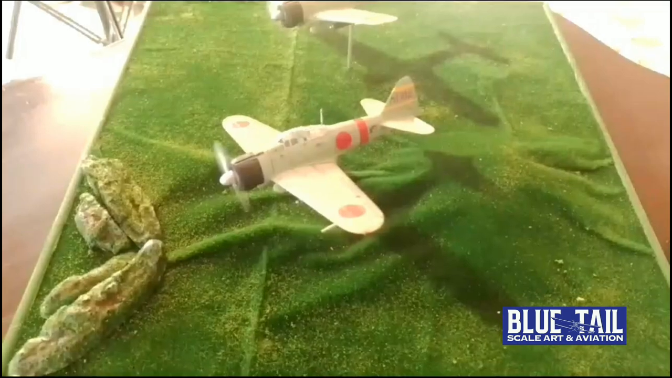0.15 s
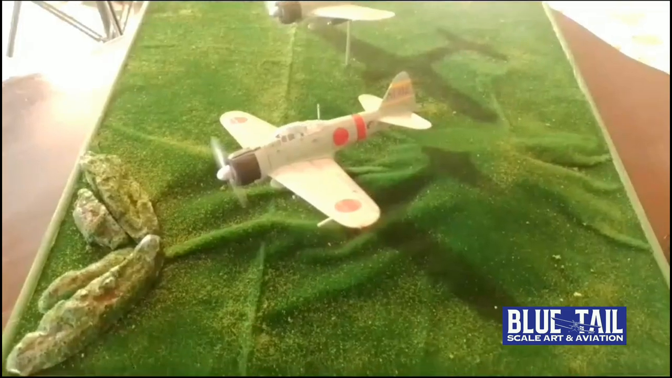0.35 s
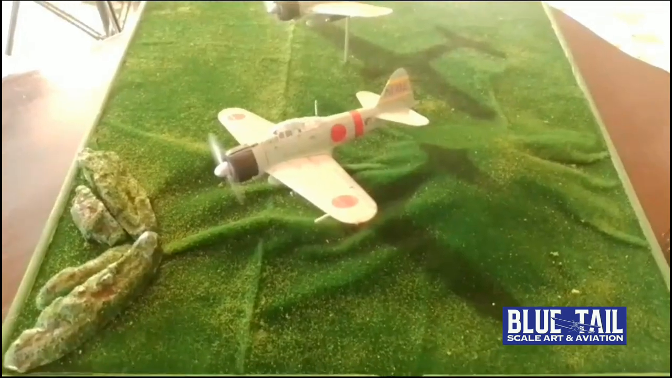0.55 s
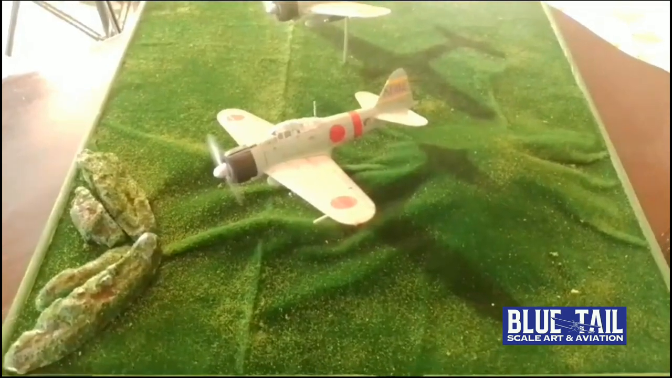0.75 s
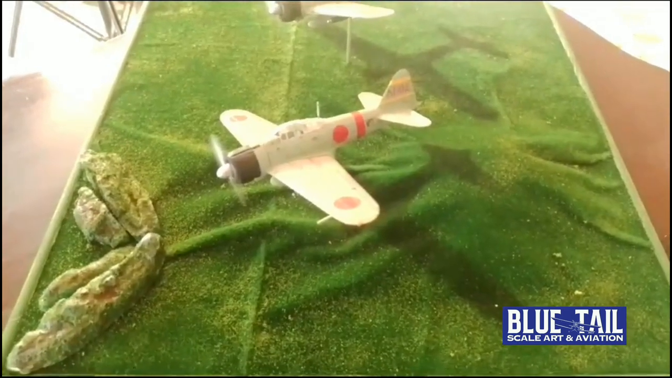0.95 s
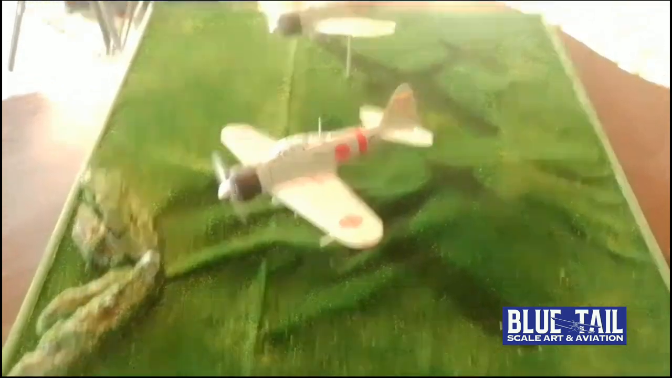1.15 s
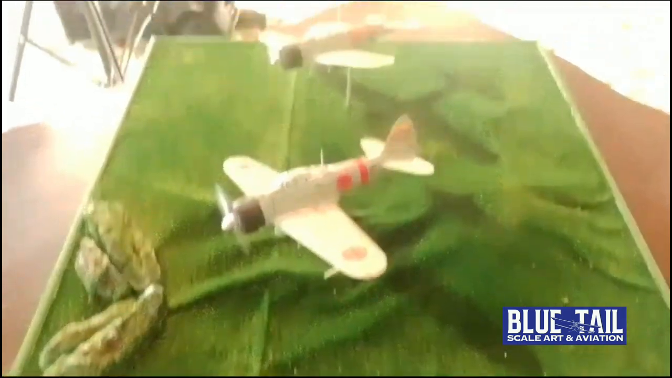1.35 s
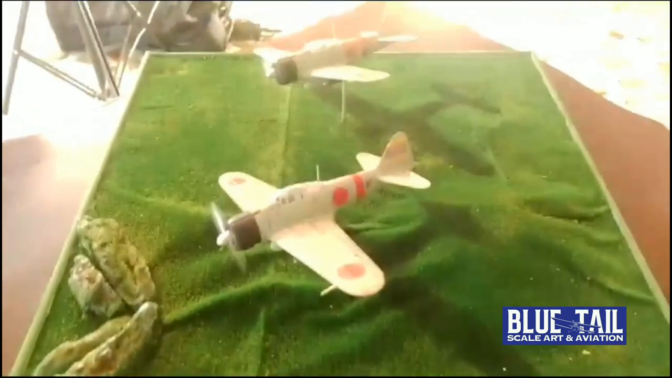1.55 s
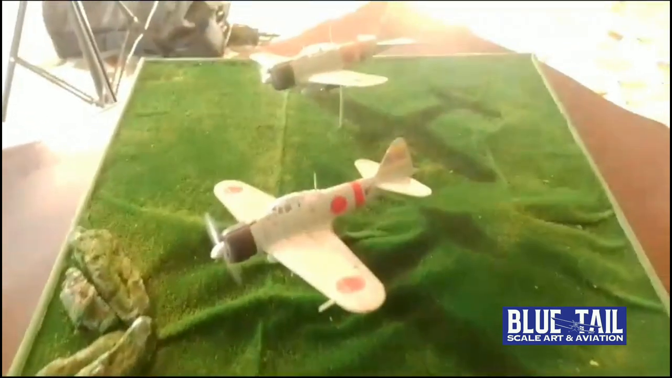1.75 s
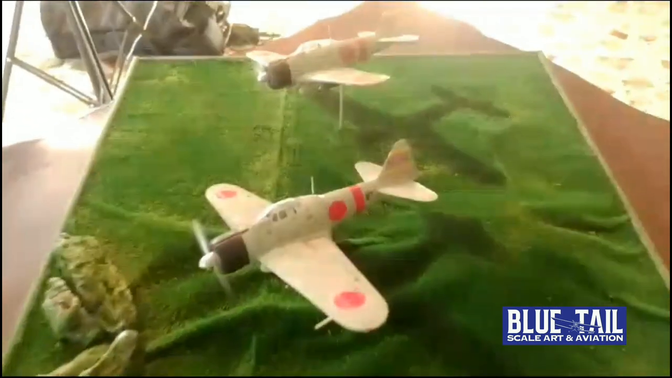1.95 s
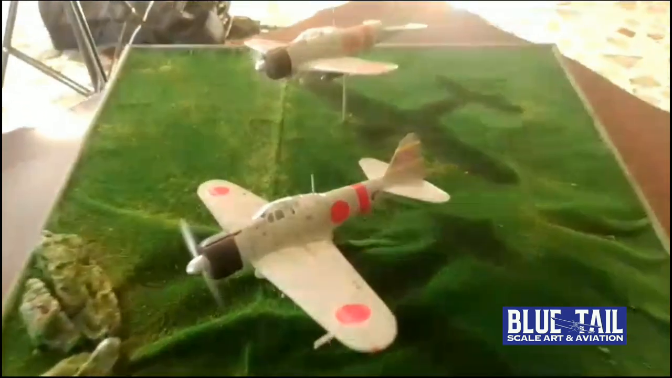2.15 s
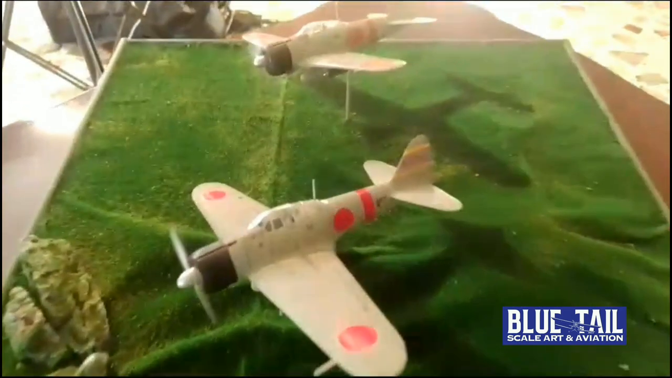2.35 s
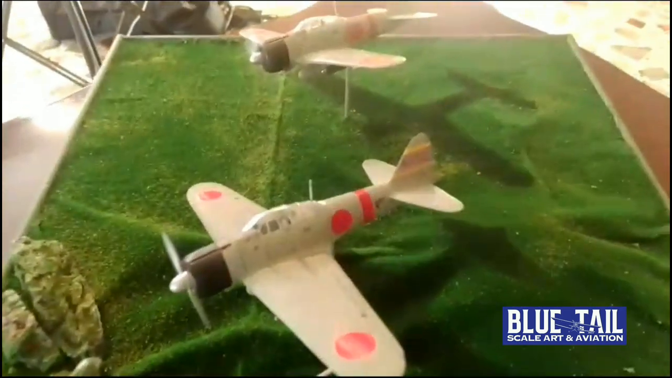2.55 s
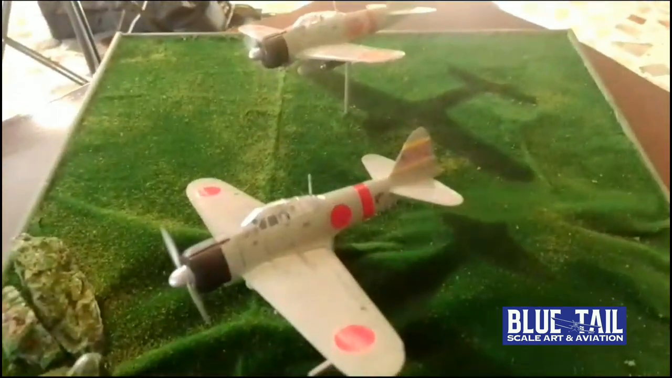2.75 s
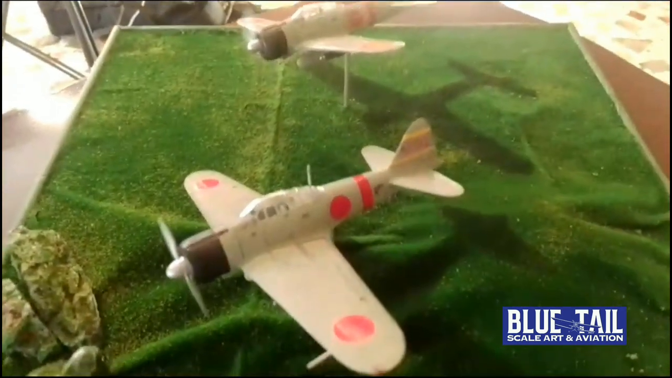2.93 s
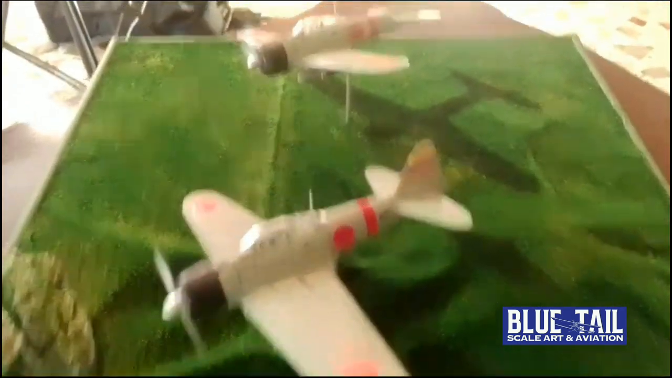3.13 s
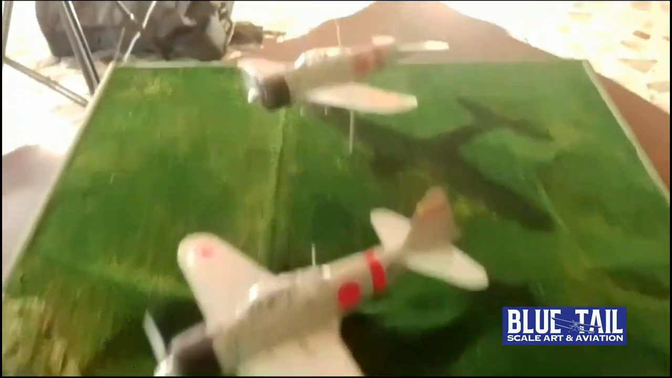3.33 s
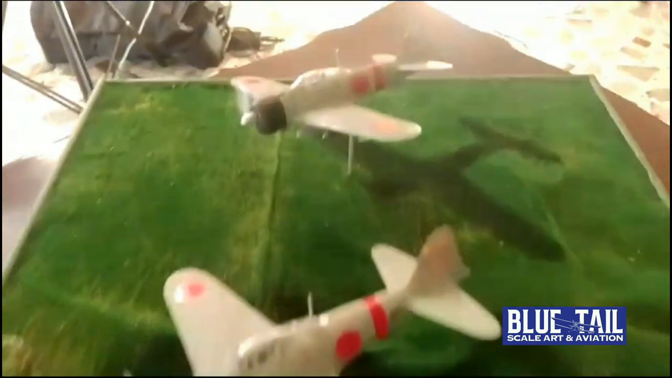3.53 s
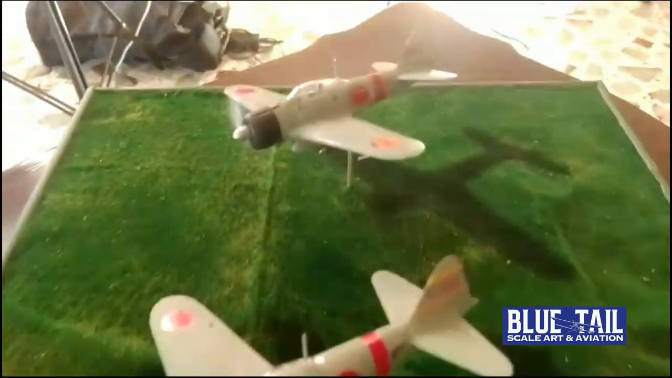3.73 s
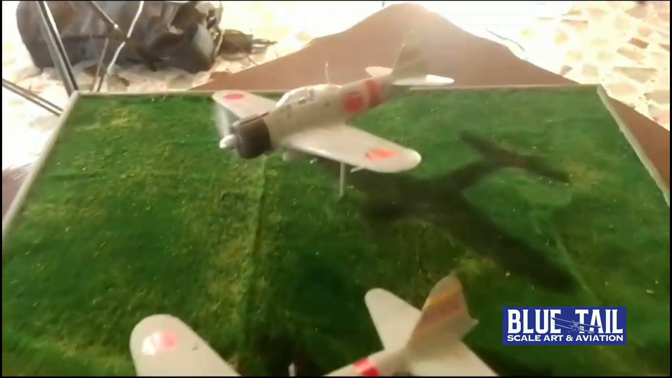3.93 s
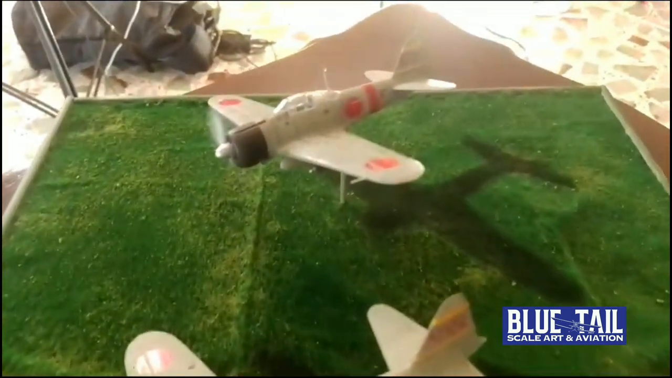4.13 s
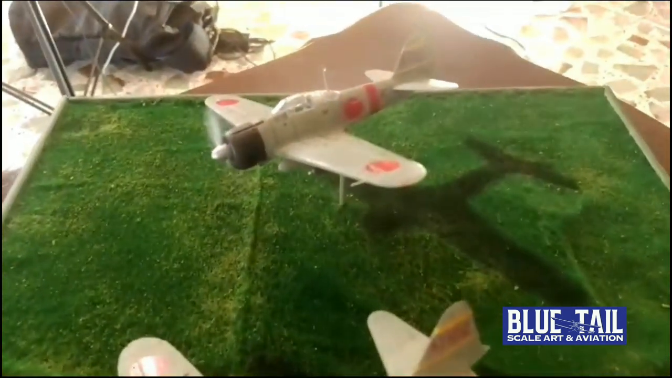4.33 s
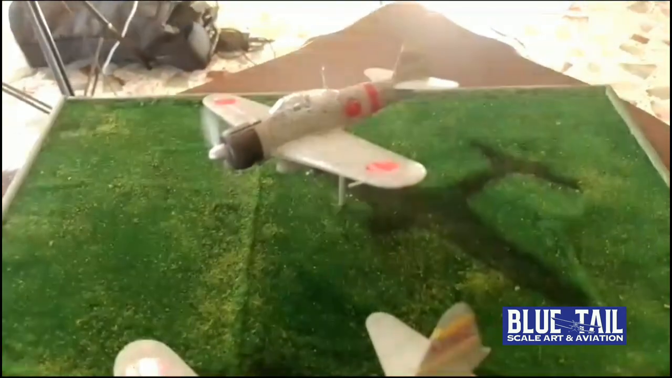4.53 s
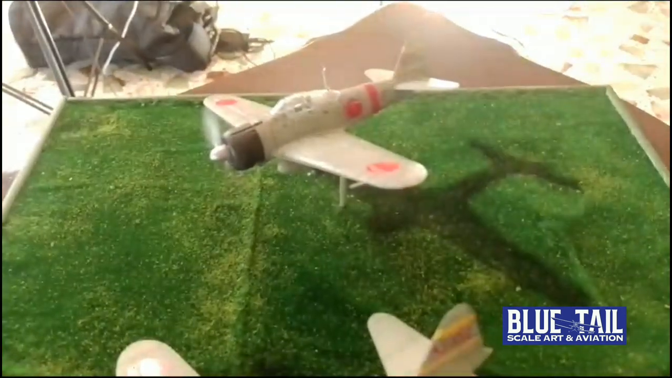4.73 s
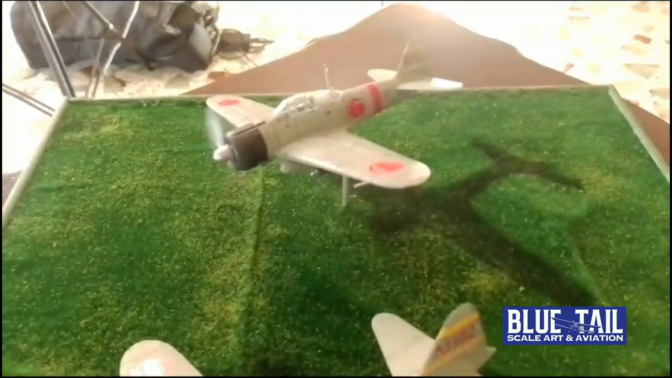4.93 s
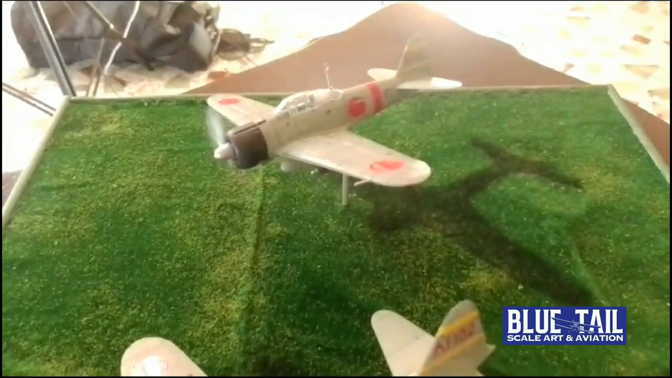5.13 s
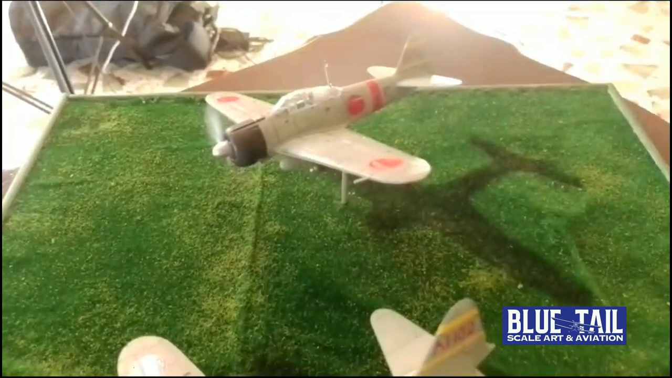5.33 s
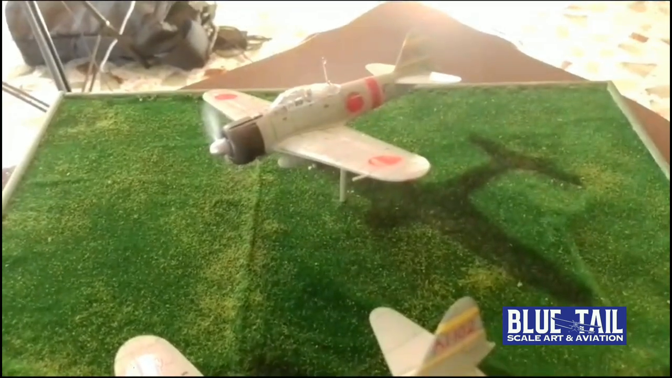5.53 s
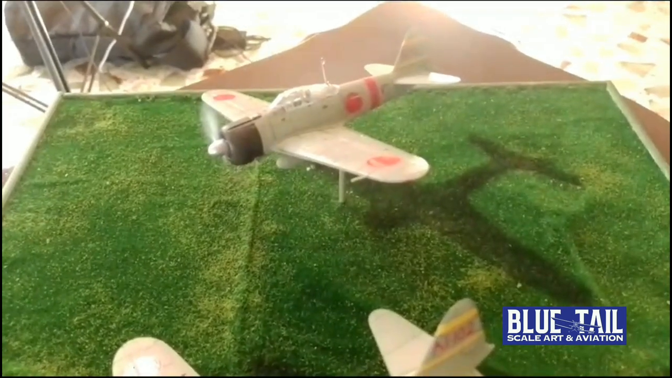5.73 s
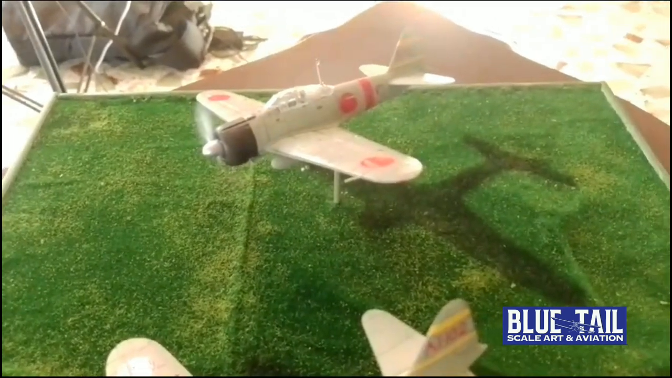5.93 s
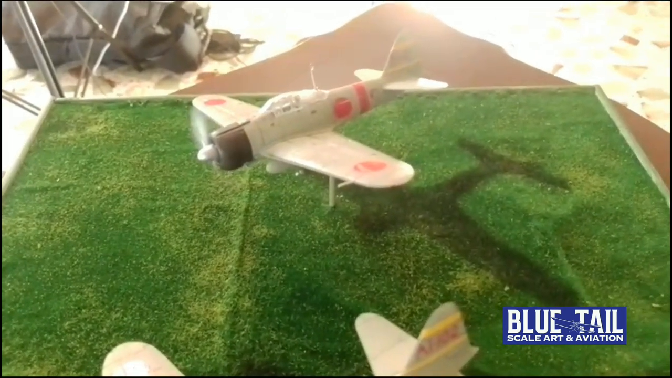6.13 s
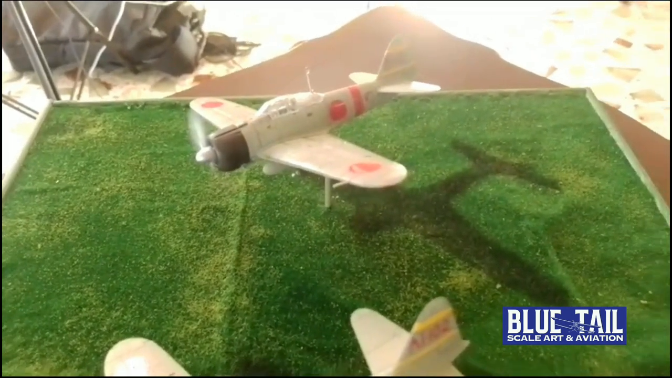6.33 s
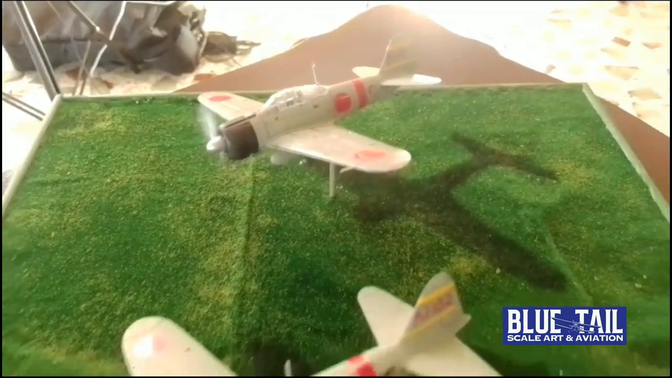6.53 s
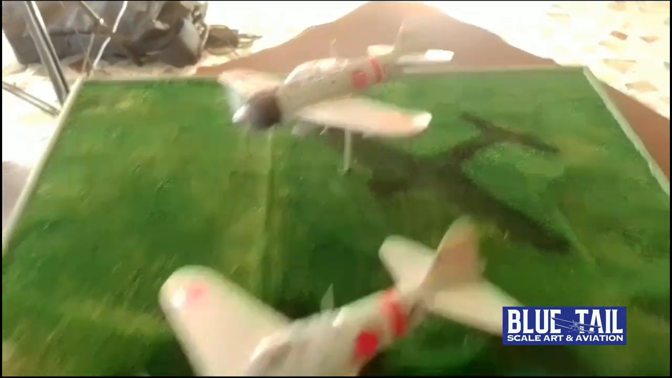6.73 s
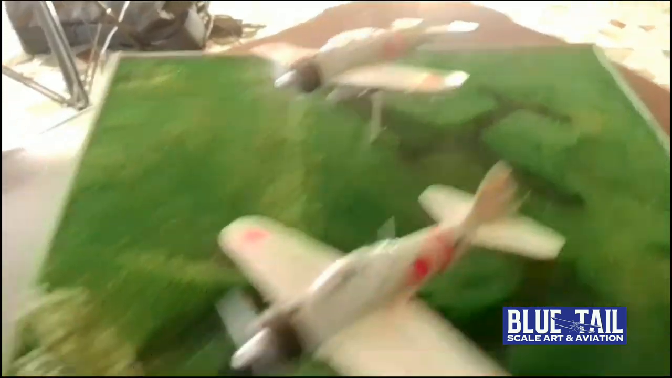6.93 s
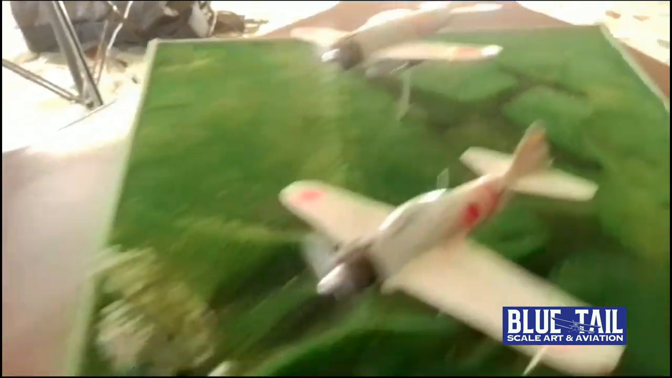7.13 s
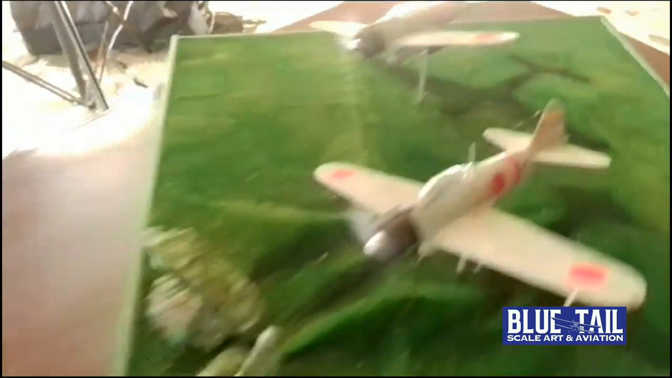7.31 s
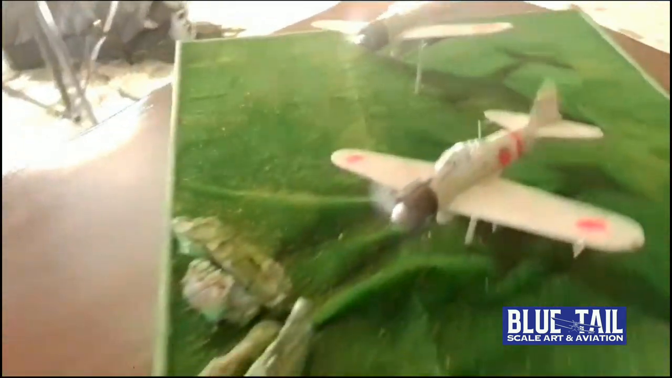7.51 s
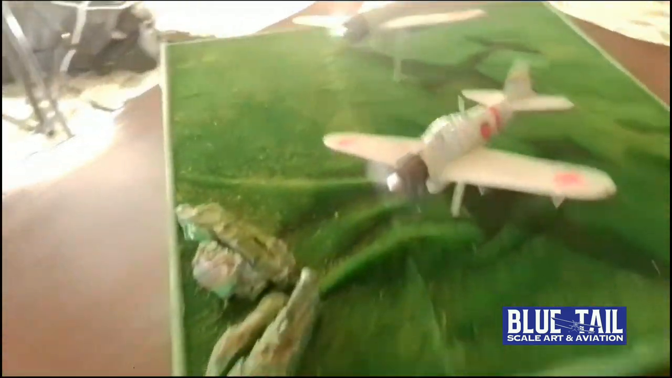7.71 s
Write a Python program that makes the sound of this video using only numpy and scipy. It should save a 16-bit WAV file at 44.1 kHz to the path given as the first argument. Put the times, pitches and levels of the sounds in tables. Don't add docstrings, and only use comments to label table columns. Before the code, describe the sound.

About 0.7 seconds of complete silence, then two small brushed motors on model planes cut in abruptly at steady speed. Dry, rapid bearing scraping makes a bright, sizzling whirr, with a faint buzz and whine from the nearer motor. A thin handheld phone microphone moves between them in a quiet room, so high metallic rings come and go. A hoarse, unsteady drone swells faintly around the middle. The whirr continues to the end.

```python
import sys
import numpy as np
from scipy import signal
from scipy.fft import rfft, irfft, next_fast_len
from scipy.io import wavfile
from scipy.ndimage import uniform_filter1d

SR = 44100
rng = np.random.default_rng(int(sys.argv[2]) if len(sys.argv) > 2 else 0)


def volts(x):
    e = np.asarray(x, float) / 20
    return 10 ** e


def unload_wav(signal):
    wavfile.write(
        sys.argv[1],
        SR,
        np.round(np.clip(np.atleast_2d(signal).T, -1, 1) * 32767).astype(np.int16),
    )


N = 347067
T = np.arange(N) / SR

# (from [s], to [s])
ALWAYS = (0, 9)
FRONT = (0, 1.85)
FRONT_CLOSE = (1.25, 1.9)
BETWEEN = (2, 4.05)
RISING = (3.4, 9)
REAR = (4.1, 7)
SWEEP = (6.7, 7.3)
AWAY = (7.3, 9)
# (frequency [Hz], density [dB per Hz])
HISS = [(1180, -61), (2000, -47), (3350, -35.5), (4300, -7.5), (4800, -10.5), (5950, -12), (7130, 6.5),
        (8320, -3), (10200, -18.5), (11500, 8.5), (12300, -3), (15600, -14)]


def curve(rows):
    s, *columns = np.transpose(rows)
    return [np.interp(T, s, column) for column in columns]


def unit(x):
    return x / np.sqrt(np.mean(x ** 2))


def walk(rate):
    hold = int(SR / rate)
    steps = np.repeat(rng.standard_normal(N // hold + 1), hold)
    return 1.43 * uniform_filter1d(uniform_filter1d(steps, hold), hold)[:N]


def ring(x, hz, width, order=2):
    band = [hz - width / 2, hz + width / 2]
    return unit(signal.sosfilt(signal.butter(order, band, "band", fs=SR, output="sos"), x))


def sliding(force, centre, width, order):
    carrier = np.exp(2j * np.pi * np.cumsum(curve(centre)[0]) / SR)
    lowpass = signal.butter(order, width / 2, fs=SR, output="sos")
    return unit((signal.sosfilt(lowpass, force / carrier) * carrier).real)


def colour(x, points):
    hz, db = np.transpose(points)
    size = next_fast_len(N)
    log_hz = np.log(np.arange(size // 2 + 1) * SR / size + 1)
    gain = volts(np.interp(log_hz, np.log(hz), db))
    return unit(irfft(rfft(x, size) * gain, size)[:N])


def toward_phone(start, end, fade_s):
    return np.clip(np.minimum(T - start, end - T) / fade_s + .5, 0, 1)


def facing(force, rings, fade_s, flicker_db, order=2):
    out = 0
    for hz, width, db, (start, end) in rings:
        gain = toward_phone(start, end, fade_s) ** 2 * volts(db + flicker_db * walk(9))
        out = out + gain * ring(force, hz, width, order)
    return out


def spells(rows, fade_s, flicker_db):
    power = sum(volts(2 * db) * toward_phone(start, end, fade_s) for start, end, db in rows)
    return np.sqrt(power) * volts(flicker_db * walk(10))


def turning(hz, wobble):
    return np.cumsum(hz * (1 + wobble * walk(9))) / SR


def orders(turns, lines):
    return sum(volts(db + 1.84 * walk(12)) * np.sqrt(2) * np.sin(2 * np.pi * k * turns) for k, db in lines)


def scrape(turns, scrapes, scatter_db, jitter, rise_ms, fall_ms, rub_db):
    rasp = np.zeros(N)
    for share, db in scrapes:
        count = np.arange(1, int(turns[-1]) + 1)
        late, louder = rng.standard_normal((len(count), 2)).T
        contact = np.searchsorted(turns[:-1], count + share + jitter * late)
        rasp[contact] += volts(db + scatter_db * louder)
    for ms in (rise_ms, fall_ms):
        rasp = signal.lfilter([1], [1, -np.exp(-1000 / ms / SR)], rasp)
    return unit((unit(rasp) + volts(rub_db)) * rng.standard_normal(N))


def scrape_hiss(force):
    grit = np.sign(rng.standard_normal(N))
    return colour(force * grit, HISS)


def hand_distance():
    # (time [s], rear motor level [dB], front motor level [dB])
    near = [(.7, -28, -26), (1.25, -27.5, -27.5), (1.7, -28.5, -25), (1.9, -32.5, -26), (2.3, -27.5, -27.5),
            (3, -27, -29.5), (3.5, -27, -25), (4, -28.5, -28), (4.4, -27.5, -25.5), (5, -27, -25.5),
            (5.7, -26, -28), (6.4, -28.5, -27), (6.8, -27.5, -25.5), (7.1, -27, -26), (7.87, -26.5, -24)]
    return [volts(db + 1.0 * walk(8)) for db in curve(near)]


def rear_shaft():
    # (time [s], shaft speed [turns per s])
    speed = [(.7, 56.7), (2.5, 57.6), (3.5, 57.6), (7, 59.4), (7.87, 59.6)]
    return turning(curve(speed)[0], wobble=.002)


def rear_bearing(turns):
    # (share of the turn [0-1], strength [dB])
    scrapes = [(0, -6.5), (.22, -17), (.49, -5.5), (.8, -21)]
    return scrape(turns, scrapes, scatter_db=0.5, jitter=0.0031, rise_ms=0.68, fall_ms=0.86, rub_db=-14.5)


def rear_motor(force):
    rings = [ (6863, 320, -7, ALWAYS), (7370, 370, -8.5, ALWAYS), (7953, 405, -4, ALWAYS),
             (8236, 296, -7.5, ALWAYS), (8750, 190, -23, BETWEEN), (9300, 170, -12, (1.45, 4.14)),
             (9150, 200, -14, SWEEP), (8584, 420, -18, AWAY), (5820, 110, -23, FRONT),
             (12300, 330, -10, (2.8, 4.6)), (8900, 140, -6, (9.8, 9)), (5530, 140, -20, REAR),
             (4980, 190, -12.5, AWAY), (3642, 114, -27, ALWAYS), (3608, 104, -20, (4.52, 7.7)),
             (3953, 166, -25.5, ALWAYS), (10550, 210, -7, (3.88, 7.2)), (11430, 300, -2.5, REAR),
             (12250, 310, -3, REAR), (808.6, 58, -30.5, ALWAYS)]
    # (time [s], centre [Hz])
    cowl_hz = [(2, 5730), (3.7, 5830), (4.5, 5966), (6.6, 5960), (7.2, 5740)]
    # (from [s], to [s], level against the motor [dB])
    cowl = [(2, 4.05, -13.5), (4.05, 5.7, -12.5), (5.7, 7, -13.5), (7, 7.45, -17)]
    out = facing(force, rings, fade_s=0.37, flicker_db=1.0)
    out = out + volts(-8.0) * scrape_hiss(force)
    return out + spells(cowl, .3, 0.84) * sliding(force, cowl_hz, width=150, order=2)


def front_shaft():
    # (from [s], shaft speed [turns per s], hunting [turns per s])
    ways = [(0, 126.5, .2), (1.93, 134.8, .5), (3.9, 136.8, .4), (4.1, 132.6, .7), (5.55, 139, .7),
            (6.16, 137.3, .8), (6.46, 133.9, .6), (7.14, 138.6, 1), (7.45, 139.6, .8)]
    s, hz, hunt_hz = np.transpose(ways)
    settle_s, hunt_per_s = .1, 9
    now = np.searchsorted(s, T, "right") - 1
    speed = uniform_filter1d(hz[now], int(settle_s * SR)) + hunt_hz[now] * walk(hunt_per_s)
    return turning(speed, wobble=.001)


def front_bearing(turns):
    # (share of the turn [0-1], strength [dB])
    scrapes = [(0, 6), (.5, -10.5)]
    return scrape(turns, scrapes, scatter_db=0.0, jitter=0.0049, rise_ms=0.55, fall_ms=0.88, rub_db=-11.5)


def front_motor(force):
    rings = [ (11600, 560, 0, (0, 1.95)), (10880, 300, -7, (0, 2.1)), (10950, 340, -15, (1, 2.24)),
             (11630, 120, -10.5, FRONT_CLOSE), (8910, 350, -6, FRONT), (5250, 150, -15, FRONT),
             (5960, 160, -13, FRONT_CLOSE), (14600, 1400, -10, (0, 1.96)), (14500, 900, -19, (7.3, 9)),
             (859, 89, -27, FRONT), (11450, 210, -12.5, BETWEEN), (11880, 270, -14, BETWEEN),
             (11620, 380, -3, (6.88, 7.4)), (11580, 860, -1.5, (3.37, 6.85)), (11800, 650, -1.5, (7.4, 9)),
             (11150, 640, -12, RISING), (4310, 450, -13.5, SWEEP), (4425, 140, -19, (5.3, 6.3)),
             (10340, 540, -13, (5.9, 7.6)), (13600, 880, -15, ALWAYS), (9940, 960, -21.5, ALWAYS),
             (15050, 460, -19, RISING)]
    return facing(force, rings, fade_s=0.36, flicker_db=0.76, order=3) + volts(-2.5) * scrape_hiss(force)


def can_ring(rear, front):
    # (time [s], centre [Hz])
    centre = [(3.3, 12500), (4.2, 13170), (5.6, 13020), (6.75, 13050), (7.1, 12750), (7.45, 12750),
              (7.87, 12950)]
    # (from [s], to [s], level [dB])
    can = [(0, 1.8, -39), (1.9, 3.45, -37), (3.5, 4.5, -25.5), (4.2, 6.92, -26), (6.95, 6, -43),
           (7.4, 7.3, -28), (7.65, 9, -18)]
    return spells(can, 0.33, 1.0) * sliding(rear + 0.53 * front, centre, width=560, order=4)


def shaft_ring(rear, front):
    # (time [s], centre [Hz])
    centre = [(4, 14600), (4.6, 14500), (5.5, 14480), (6.2, 14650), (6.8, 14380)]
    # (from [s], to [s], level [dB])
    shaft = [(3.5, 3.95, -35), (4.22, 4.6, -25.5), (4.6, 5.55, -22), (5.55, 6.72, -30), (0, 9, -48)]
    return spells(shaft, 0.31, 1.0) * sliding(front + 0.18 * rear, centre, width=580, order=4)


def front_buzz(turns):
    rings = [(4320, 70, -47, (0.89, 1.87)), (4300, 187, -44, (1.99, 3.9)), (5190, 100, -45, FRONT),
             (1554, 110, -54, (0.94, 1.88)), (1462, 75, -53, REAR), (3160, 100, -54.5, (5.1, 6.3)),
             (4420, 300, -44, (6.7, 7.18)), (4220, 420, -43, (7.14, 7.4)), (5830, 100, -44.5, FRONT),
             (1450, 74, -57.5, (6.2, 7.15)), (3340, 460, -59, AWAY), (2830, 2300, -60.5, REAR),
             (5770, 63, -49, BETWEEN)]
    # (frequency [Hz], density [dB per Hz])
    bed = [(500, -50), (1000, -8), (2300, -4), (3300, 0), (5500, 1), (6500, -10)]
    count = 56
    knocks = unit(np.sin((2 * count + 1) * np.pi * turns) / (np.sin(np.pi * turns) + 1e-9))
    knocks = knocks * volts(1.8 * walk(90))
    out = facing(knocks, rings, fade_s=.2, flicker_db=1.5)
    return out + volts(-55.5 + 2.1 * walk(6)) * colour(knocks, bed)


def commutator_whine(turns):
    # (from [s], to [s], level [dB])
    whine = [(0, 1.757, -45), (1.95, 4.18, -60.5), (5.3, 5.6, -64), (5.6, 7.1, -66), (6.5, 7.17, -57.5),
             (0, 9, -70)]
    return spells(whine, 0.25, 1.0) * orders(turns, [(7, 0)])


def rear_hum(turns):
    return orders(turns, [(7, -71), (9, -64), (13, -69.0), (14, -62.5), (18, -70.5)])


def shudders():
    # (time [s], level [dB])
    swells = [(.92, -57), (1.14, -65), (3.44, -47), (3.64, -48), (3.84, -62), (3.96, -50), (4.2, -52),
              (4.36, -64), (4.58, -46), (4.76, -37.5), (4.86, -35.5), (5.08, -41), (5.31, -47), (5.43, -49),
              (5.75, -39), (5.97, -48), (6.25, -41), (6.709, -59), (7.1, -49)]
    swell_s, hum_db = 0.055, -55.5
    return volts(hum_db) + sum(volts(db) * np.exp(-((T - s) / swell_s) ** 2) for s, db in swells)


def hull_on_stand(rear):
    rings = [ (1375, 95, -4.5, ALWAYS), (1696, 79, -8.5, REAR), (2020, 66, -13.5, REAR),
             (2088, 104, -12, REAR), (2060, 77, -6.5, (3.37, 4.02))]
    # (from [s], to [s], level [dB])
    hull = [(0, 0.62, -40), (1.05, 1.75, -50.5), (1.9, 6, -54.5), (3.95, 7.15, -40.5), (7.15, 9, -66)]
    shake = volts(1.46 * walk(40)) * (rng.standard_normal(N) + 0.32 * rear)
    drone = spells(hull, 0.18, 0.87) * facing(shake, rings, fade_s=0.46, flicker_db=1.2)
    return drone + shudders() * volts(-8.5) * ring(shake, 516.7, 33.3)


def room():
    # (frequency [Hz], density [dB per Hz])
    tone = [(15, -47), (25, -17), (48, -45), (194, -22), (452, -9.5), (512, -11), (579, -8.5), (806, -12.5),
            (1010, -6.5), (2090, -8), (2310, -12), (3500, -8.5), (4550, -54), (7700, -120)]
    return volts(-53 + 1.6 * walk(3.8)) * colour(rng.standard_normal(N), tone)


def narrow_dips(x):
    # (frequency [Hz], width [Hz])
    dips = [(1640, 60), (1860, 70), (2340, 150), (2830, 160), (3390, 150), (4170, 130), (4820, 150),
            (5650, 100), (6420, 200), (7110, 130), (10800, 220), (12270, 260)]
    for hz, width in dips:
        depth = np.clip(.88 + .25 * walk(6), 0, 1)
        x = x - depth * signal.lfilter(*signal.iirpeak(hz, hz / width, fs=SR), x)
    return x


def scene():
    rear_gain, front_gain = hand_distance()
    rear_turns, front_turns = rear_shaft(), front_shaft()
    rear, front = rear_bearing(rear_turns), front_bearing(front_turns)
    out = rear_gain * rear_motor(rear) + front_gain * front_motor(front)
    out += can_ring(rear, front) + shaft_ring(rear, front)
    out += front_buzz(front_turns) + commutator_whine(front_turns)
    out += rear_hum(rear_turns)
    out += hull_on_stand(rear)
    out += room()
    return narrow_dips(out)[None]


def band_limit(x):
    return signal.sosfilt(signal.butter(12, 15730, fs=SR, output="sos"), x)


def record(dry):
    # (time [s], level [dB])
    ticks = [(4.993, -60), (5.512, -60)]
    start_s, tick_s = .7012, 0.00084
    on = np.clip((T - start_s) / 0.00033, 0, 1)
    x = signal.sosfilt(signal.butter(2, 160, "high", fs=SR, output="sos"), dry * on)
    x = signal.sosfilt(signal.ellip(8, .2, 24, 15490, fs=SR, output="sos"), x)
    x = x + volts(-89.5) * on * ring(rng.standard_normal(N), 70, 130)
    for s, db in ticks:
        x = x + volts(db) * np.exp(-((T - s) / tick_s) ** 2)
    return band_limit(x)


dry = scene()
out = record(dry)
unload_wav(out)
```